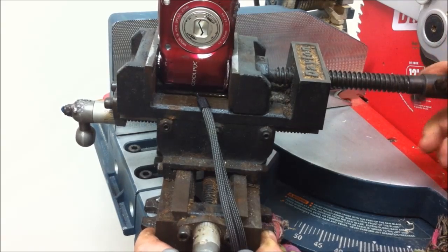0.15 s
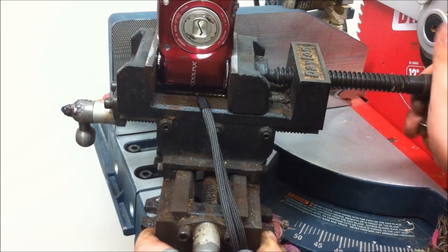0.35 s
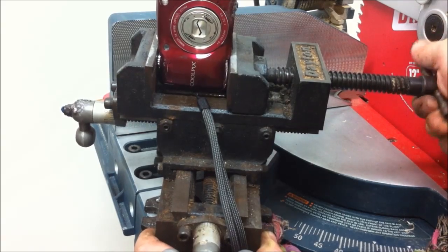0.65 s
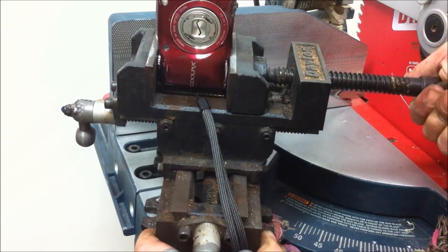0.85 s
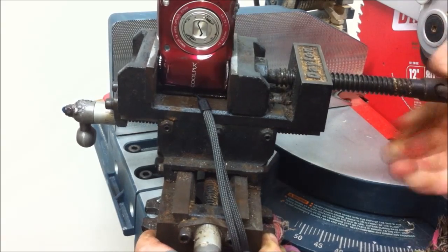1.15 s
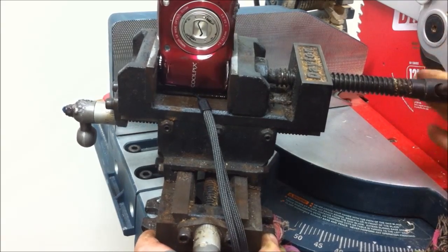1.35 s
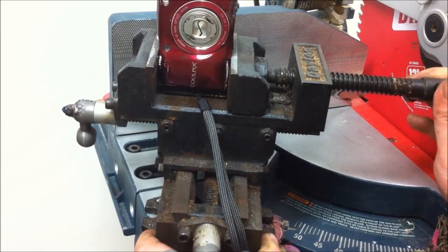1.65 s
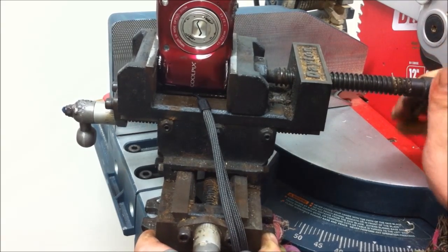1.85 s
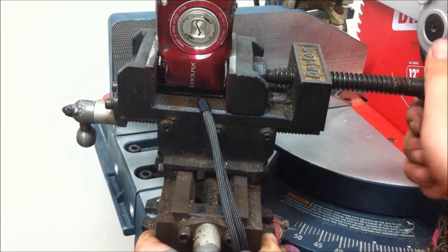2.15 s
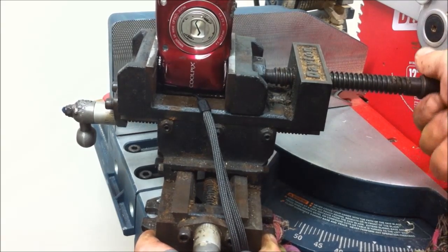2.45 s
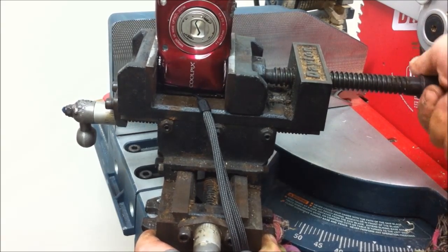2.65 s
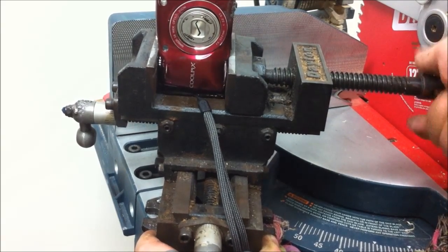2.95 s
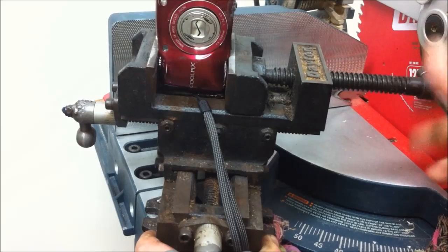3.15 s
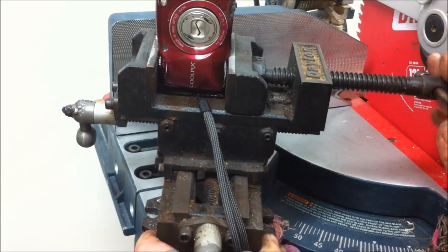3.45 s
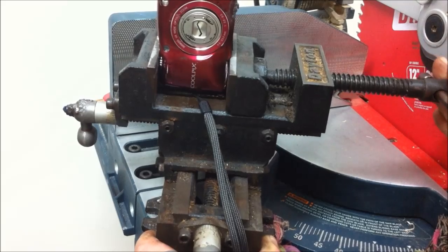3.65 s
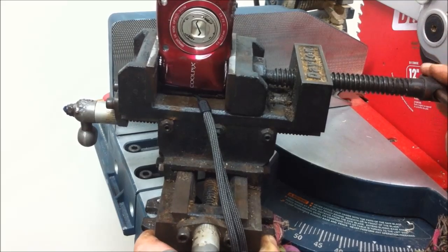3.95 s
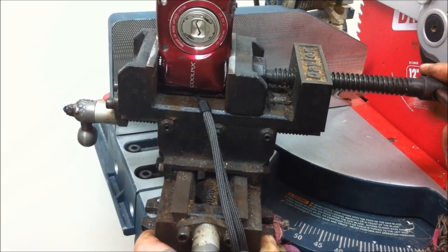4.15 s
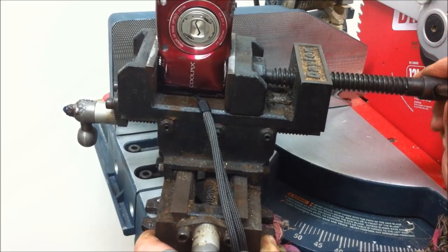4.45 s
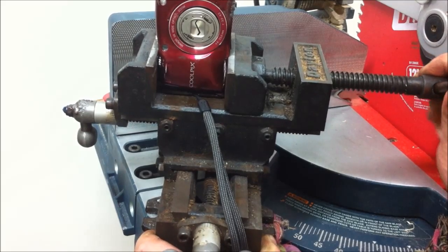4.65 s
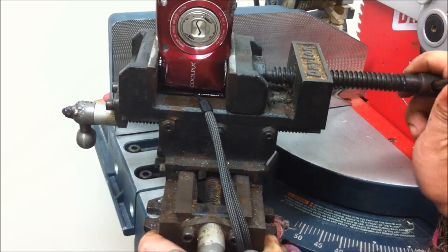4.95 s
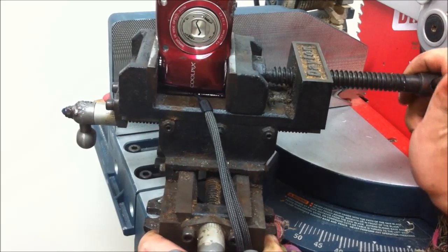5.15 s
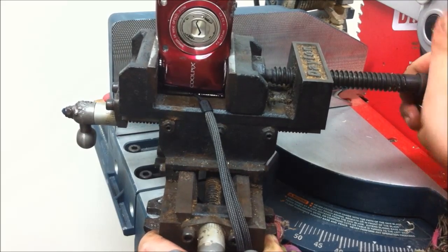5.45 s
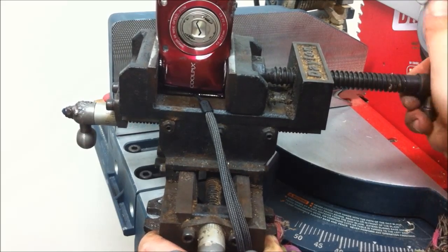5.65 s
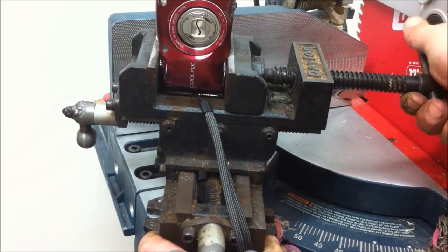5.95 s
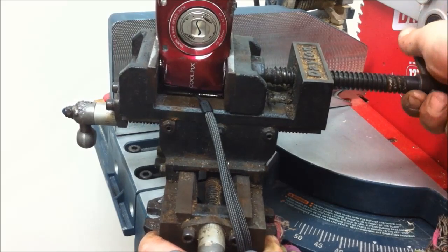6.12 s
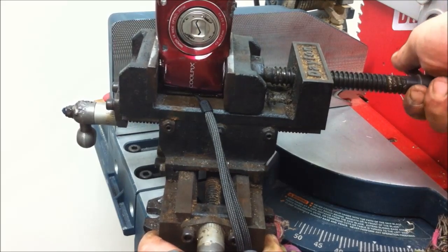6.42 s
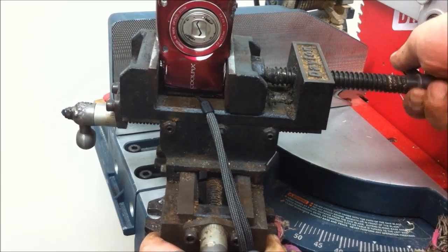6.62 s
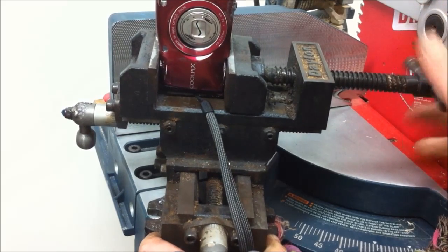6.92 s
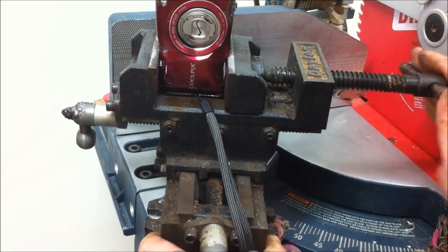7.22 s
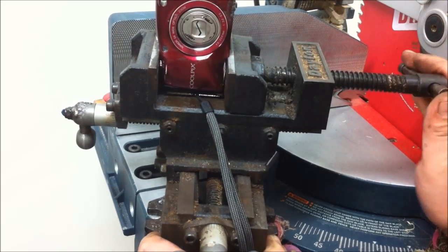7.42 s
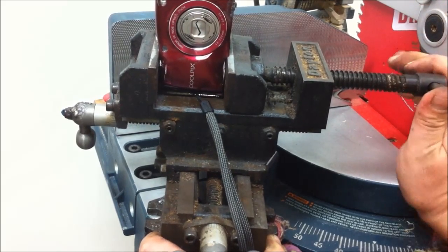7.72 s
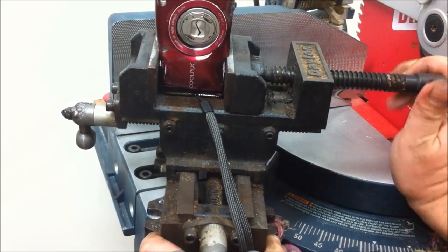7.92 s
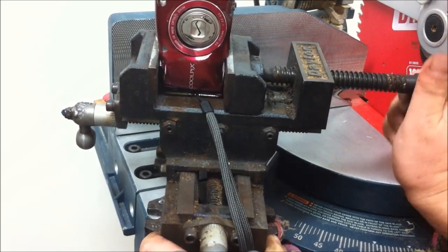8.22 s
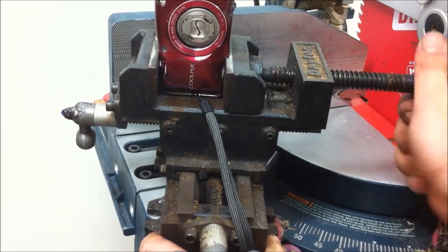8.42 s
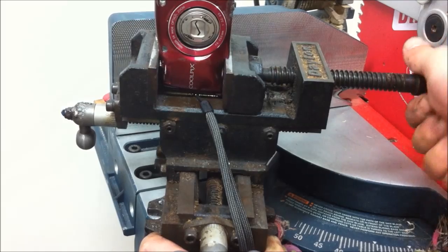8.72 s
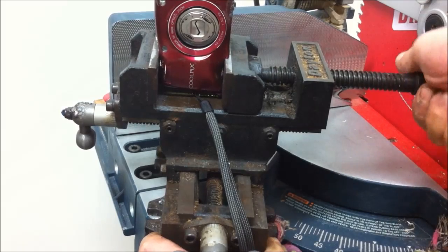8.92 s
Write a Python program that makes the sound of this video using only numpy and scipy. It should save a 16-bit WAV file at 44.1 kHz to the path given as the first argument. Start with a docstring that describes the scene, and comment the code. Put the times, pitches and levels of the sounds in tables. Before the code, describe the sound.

Close to the microphone in a reverberant workshop, a bench vise squeezes a plastic camera. Sharp cracks come irregularly, the loudest a hard snap just after two seconds, each answered by a room tail of about a second. Low bench knocks and short screw grinds lie between them. The middle is sparser; around seven seconds the metal handle clinks and thumps, then cracks crowd together toward the end over steady hiss.

```python
"""Camera crushed in a bench vise

A bench vise is screwed tight on a compact camera in a hard-walled workshop, close to the microphone.
The plastic shell gives way in sharp cracks: short bursts of tearing noise ring through resonances.
The handle clinks and knocks in short decaying rings; random jolts of the screw grind into the booming bench.
The room answers every crack for about a second; a faint whistle comes and goes over a steady hiss."""
import sys
import numpy as np
from scipy import signal
from scipy.fft import rfft, irfft, next_fast_len
from scipy.io import wavfile

SR = 44100
rng = np.random.default_rng(int(sys.argv[2]) if len(sys.argv) > 2 else 0)


def put_to_file(sound):
    """Save the sound as 16-bit audio at rate SR, in the file named by the first command-line argument."""
    columns = np.atleast_2d(sound).T  # one column per channel
    safe = np.clip(columns, -1, 1)
    whole_steps = np.round(safe * 32767)
    wavfile.write(sys.argv[1], SR, whole_steps.astype(np.int16))


def how_loud(loudness_db):
    """Turn decibels into a plain amplitude multiplier (0 dB gives 1, 20 dB gives 10)."""
    steps = np.asarray(loudness_db, float) / 20
    return 10 ** steps


N = 400428  # samples
LEAD = SR // 4  # samples of lead-in, for sounds already under way at the start

# bench, low resonances: (frequency [Hz], width [Hz], gain [dB])
BENCH_BOOM = [(130, 6.5, -16), (156, 32.3, -4.5), (202.3, 12, -3), (247.8, 86, -0.5), (303.6, 70, 0)]
# bench and vise, higher resonances: (frequency [Hz], width [Hz], gain [dB])
BENCH_BODY = [(371.5, 39, 0.5), (484.4, 36, 0.5), (530, 50, -1.5), (600.6, 74, -3.5), (695, 48, -3),
              (939, 200, -9.5)]


def cracks():
    """Each break rings the freed piece of shell at a pitch and an overtone, crunches and spits splinters."""
    # the shell tears in broad cracks: (time [s], peak level [dB], pitch [Hz],
    # overtone and crunch level before trims [dB], splinter level [dB])
    broad_rows = [(-0.053, -20, 2020, -39, -54), (0.6613, -41.5, 1500, -48, -63),
                  (0.8135, -58, 2000, -47, -50), (0.861, -60, 2000, -50.5, -48),
                  (0.9069, -31, 1250, -22, -31.5), (1.2717, -41.5, 1170, -47, -57),
                  (1.382, -38, 2200, -57, -61), (1.4272, -34, 1150, -32, -48),
                  (1.4343, -37, 2570, -42, -46), (1.5048, -18.5, 1920, -12, -18.5),
                  (1.8175, -36, 1390, -25, -31), (1.9747, -40.5, 1330, -37.5, -59),
                  (2.0386, -36.5, 1640, -39, -56), (2.066, -41.5, 1900, -42.5, -43),
                  (2.084, -42, 1590, -43, -55), (2.1554, -21.5, 1590, -28, -47),
                  (2.36, -43, 2000, -35, -40), (2.4833, -54, 2080, -26, -28.5),
                  (2.6879, -46, 1900, -41.5, -70.5), (3.5094, -43, 1150, -35, -49),
                  (3.66, -53.5, 3010, -55.5, -61), (3.7, -44, 1900, -59, -70.5),
                  (3.725, -46, 2400, -65, -72), (4.515, -55.5, 3210, -52, -66),
                  (4.552, -55, 3300, -59, -64), (4.607, -54, 1500, -57, -63), (4.649, -56, 1370, -46, -48),
                  (5.2802, -47, 1380, -96, -66), (5.4323, -48, 1460, -39.5, -47.5),
                  (5.4545, -23.5, 1250, -27, -34.5), (5.7, -73, 1400, -41, -49),
                  (6.0041, -42, 1190, -17.5, -47), (6.018, -50, 2200, -31, -33),
                  (6.2608, -53, 1260, -35.5, -35), (6.668, -46.5, 3210, -66.5, -56.5),
                  (6.79, -51, 2300, -70, -67), (7.1953, -28.5, 1270, -20.5, -27.5),
                  (7.5797, -30.5, 1230, -22, -30.5), (7.9047, -21.5, 1150, -14, -22.5),
                  (8.0152, -35, 1900, -36, -47), (8.0405, -36, 1430, -23.5, -39),
                  (8.103, -37, 1680, -34, -65), (8.309, -40, 1900, -37.5, -50),
                  (8.3425, -41.5, 1430, -36, -37), (8.437, -58, 1900, -42, -48),
                  (8.5545, -66, 1275, -41.5, -41), (8.602, -51, 1480, -41, -60),
                  (8.6198, -31, 2200, -36.5, -33.5), (8.697, -26, 2100, -35, -31),
                  (8.8163, -56, 1410, -24, -82), (8.843, -24.5, 2050, -26.5, -34),
                  (8.9745, -44, 1720, -30, -50), (8.9835, -26, 1500, -38, -42),
                  (8.9893, -21.5, 1510, -22.5, -23.5), (9.0377, -33, 1890, -30, -34.5)]
    # stiff parts snap clean: (time [s], peak level [dB], pitch [Hz], width [Hz], overtone level [dB],
    # overtone [Hz], overtone width [Hz], crunch level [dB], splinter level [dB], room level [dB])
    clean_rows = [(0.357, -33.5, 1240, 600, -31, 2220, 356, -40.5, -61, -13),
                  (0.8943, -30.5, 1360, 500, -28.5, 3170, 1900, -26.5, -41, -11.5),
                  (2.1671, 2, 1780, 860, -16, 4150, 796, -19.5, -21, -12),
                  (3.1566, -18.5, 1200, 616, -17.5, 2910, 502, -12, -48.5, -10),
                  (4.6835, -38.5, 2250, 700, -28, 4800, 331, -22.5, -38, -11.5),
                  (5.5282, -38, 1410, 596, -25, 2900, 590, -27, -40, -14),
                  (5.8627, -12.5, 1620, 710, -13, 3580, 1330, -27, -56.5, -10.5),
                  (6.212, -33, 1190, 300, -24.5, 2780, 200, -15.5, -28, -11.5),
                  (6.4098, -27.5, 3230, 2200, -27, 5820, 500, -20, -41.5, -10.5),
                  (8.668, -15, 2050, 1520, -19.5, 4180, 825, -9, -21, -12.5)]
    breaks = []
    for s, db, hz, over_db, splinter_db in broad_rows:
        panel_part = (s, db, hz, 0.54 * hz + 100)
        over_part = (over_db - 3.5, 1.6 * hz, 3500)  # level [dB], frequency and width [Hz]
        breaks.append((*panel_part, *over_part, over_db - 4.5, splinter_db, 0.027, -11.5))
    for *row, wet_db in clean_rows:
        breaks.append((*row, 0.018, wet_db))  # the tearing dies sooner than in a broad crack

    out = np.zeros(N + LEAD)
    for s, db, hz, width_hz, over_db, over_hz, over_width_hz, crunch_db, splinter_db, t60, wet_db in breaks:
        panel = snap(band(hz, width_hz), db, t60)
        overtone = snap(band(over_hz, over_width_hz), over_db, t60)
        crunch = snap(twice([(3100, 4200, 0)]), crunch_db, t60)
        splinters = snap(twice([(11000, 13000, 0)]), splinter_db, t60=0.0063)
        near, spread = panel + overtone + crunch + splinters
        add(out, s, room(near, wet_db, spread))
    return out[LEAD:]


def snap(response, peak_db, t60):
    """A few milliseconds of tearing through a resonance: (toward the microphone, averaged over directions)."""
    t = np.arange(1024) / SR
    onset = 1 - np.exp(-t / 0.00089)
    tear = rng.standard_normal(len(t)) * onset * how_loud(-60 * t / t60)
    near = filtered(tear, response)
    near *= how_loud(peak_db) / np.abs(signal.hilbert(near)).max()
    # over all directions: the same energy with a smooth spectrum
    click = np.eye(1, len(t), len(t) // 4)[0]
    even = filtered(click, lambda f: np.abs(response(f)))
    even *= np.linalg.norm(near) / np.linalg.norm(even)
    return np.array([near, .98 * even + .15 * near])  # some of this break's own colour reaches the walls


def band(hz, width_hz):
    """A cluster of close modes, flat on top: two resonances in series, to either side of the centre."""
    lower = modes([(hz - .35 * width_hz, .7 * width_hz, 0)])
    upper = modes([(hz + .35 * width_hz, .7 * width_hz, 0)])
    return lambda f: lower(f) * upper(f)


def handle():
    """The loose steel bar clinks in the screw's eye; the hand's grip shifts its main mode a little."""
    # clinks: (time [s], peak level [dB], low mode level [dB], main mode [Hz])
    clink_rows = [(1.26, -60, -45, 3550), (1.4343, -58, -29.5, 3570), (6.8967, -40.5, -51, 3600),
                  (7.0213, -32.5, -32, 3540), (7.0893, -40, -43, 3400), (7.0987, -40, -39, 3540),
                  (7.3962, -34, -35.5, 3480)]
    # the bar's other upper modes: (frequency [Hz], width [Hz], gain [dB])
    bar_modes = [(2200, 1100, -5), (4130, 56, 2), (5750, 350, -8.5)]
    # the bar's low mode, passed twice: (frequency [Hz], width per pass [Hz], gain per pass [dB])
    bar_low_mode = [(1190, 200, 0)]
    out = np.zeros(N + LEAD)
    for s, db, low_db, hz in clink_rows:
        main_mode = (hz, 140, 10)  # frequency and width [Hz], gain [dB]
        upper = snap(modes([bar_modes[0], main_mode, *bar_modes[1:]]), db, t60=0.031)
        low = snap(twice(bar_low_mode), low_db, t60=0.035)
        near, spread = upper + low
        add(out, s, room(near, wet_db=-3.5, spread=spread))
    return out[LEAD:]


def knocks():
    """A soft blow: a short low ring, carried on by the bench's resonances."""
    # dull blows through vise and bench: (time [s], level before the soft onset [dB], pitch [Hz])
    blow_rows = [(-0.004, -20, 303), (0.183, -37.5, 299), (0.366, -32.5, 530), (0.606, -44, 293.4),
                 (0.905, -35, 278), (1.321, -25.5, 416), (1.443, -24.5, 474), (1.507, -6, 560),
                 (1.512, -5, 560), (1.617, -57, 444), (1.818, -21.5, 563), (2.169, -28, 750),
                 (2.885, -53, 834), (3.037, -43, 286), (3.163, -27, 260), (3.357, -33, 250),
                 (3.513, -30.5, 549), (3.666, -35.5, 648), (3.717, -31, 356), (3.834, -44.5, 270),
                 (3.951, -43.5, 285), (3.979, -36, 286), (4.217, -39.5, 560), (4.517, -39, 613),
                 (4.55, -45.5, 627), (4.62, -50, 622), (4.694, -40.5, 317), (4.943, -42, 376),
                 (4.967, -38.5, 279), (5.462, -29.5, 299), (5.873, -32, 344), (6.906, -38.5, 422),
                 (6.94, -30, 396), (7.03, -21, 530), (7.041, -12.5, 523), (7.05, -22, 397),
                 (7.077, -24, 520), (7.108, -17, 534), (7.197, -17, 530), (7.408, -18, 530),
                 (7.581, -19, 587), (7.906, -6.5, 560), (8.678, -32.5, 553), (8.853, -35, 324),
                 (9.054, -35, 363)]
    out = np.zeros(N + LEAD)
    t = np.arange(SR // 5) / SR
    for s, db, hz in blow_rows:
        cycles = 7 - 0.56 * db  # to -60 dB: hard blows are short, softer ones ring longer
        t60 = max(cycles / hz, .01)
        onset = 1 - np.exp(-t / 0.0012)
        ring = how_loud(db - 60 * t / t60) * onset * np.sin(2 * np.pi * hz * t)
        bench = how_loud(-10.5) * filtered(ring, modes(BENCH_BOOM + BENCH_BODY))
        add(out, s, room(ring + bench, wet_db=-0.5))
    return out[LEAD:]


def grind():
    """The thread slips in jolts that shake the bench's low modes and rasp the steel."""
    # pushes on the handle that make the screw grind:
    # (time [s], held [s], boom level [dB], body level [dB], scrape level [dB])
    push_rows = [(-0.01, 0.0073, -34.5, -39.5, -50), (0.3, 0.22, -55, -79, -65),
                 (0.93, 0.0094, -47, -47, -80), (1.33, 0.082, -37.5, -43.5, -59),
                 (1.522, 0.087, -36, -30, -51), (2.188, 0.0043, -38, -44.5, -50),
                 (2.34, 0.017, -74.5, -69, -49.5), (2.79, 0.03, -59.5, -88.5, -84),
                 (3.2, 0.0092, -40.5, -45.5, -79), (3.55, 0.012, -44.5, -54.5, -63),
                 (3.71, 0.041, -46, -54.5, -66), (3.97, 0.062, -55.5, -58.5, -66),
                 (4.15, 0.16, -57, -60, -69.5), (4.5, 0.048, -66.5, -52, -60.5),
                 (4.93, 0.05, -49.5, -49.5, -58.5), (5.49, 0.014, -48, -47.5, -79),
                 (6.03, 0.0095, -48.5, -52, -60), (6.24, 0.019, -56.5, -67, -58),
                 (6.5, 0.022, -50.5, -67, -73.5), (6.78, 0.029, -53.5, -62, -79.5),
                 (7.001, 0.14, -35.5, -40.5, -51.5), (7.23, 0.067, -78, -43.5, -55.5),
                 (7.41, 0.011, -38.5, -38.5, -63), (7.72, 0.015, -53, -49.5, -55),
                 (8.08, 0.03, -53, -45, -63), (8.22, 0.024, -49, -109, -92), (8.43, 0.027, -50, -60, -77.5),
                 (8.8, 0.07, -68, -52, -59), (9.06, 0.073, -45, -69, -51)]
    # rasping steel: (frequency [Hz], width [Hz], gain [dB])
    steel_modes = [(1150, 290, 6.5), (1900, 840, 1), (2665, 1470, -4)]
    boom = filtered(slips(rate=180, spread_db=3.5), twice(BENCH_BOOM))
    body = filtered(slips(rate=500, spread_db=5.0), twice(BENCH_BODY))
    scrape = filtered(slips(rate=960, spread_db=3.5), modes(steel_modes))
    boom = unit(room(boom, wet_db=-2.0)[:N])
    body = unit(room(body, wet_db=-10.5)[:N])
    scrape = unit(room(scrape, wet_db=-4.0)[:N])
    return np.sum(swells(push_rows) * [boom, body, scrape], axis=0)


def slips(rate, spread_db):
    """Stick-slip jolts at random moments, rate per second on average, a few stronger than the rest."""
    jolts = (rng.random(N) < rate / SR) * rng.standard_normal(N)
    return jolts * how_loud(spread_db * np.minimum(rng.exponential(size=N), 3))


def swells(rows):
    """One gain per level column: every row swells, holds and eases off at the same pace."""
    rise, fall = 179.5, 68  # dB per second
    hop = 64  # samples per envelope point
    t = np.arange(0, N + hop, hop) / SR
    s, held, *dbs = np.transpose(rows)[:, :, None]
    shape_db = -rise * np.maximum(s - t, 0) - fall * np.maximum(t - s - abs(held), 0)
    gains = [np.linalg.norm(how_loud(db + shape_db), axis=0) for db in dbs]  # rows add in power
    return np.array([np.interp(np.arange(N) / SR, t, gain) for gain in gains])


def whistle():
    """A narrow breathy tone, noise through a sharp resonance, faintly comes and goes."""
    # swells of the whistle: (time [s], held [s], level [dB])
    swell_rows = [(0.45, 0.2, -76), (2.9, 0.17, -72), (4.12, 0.24, -74.5), (4.93, 0.09, -68.5)]
    # its resonance, passed twice: (frequency [Hz], width per pass [Hz], gain per pass [dB])
    whistle_mode = [(1936, 79, 0)]
    tone = unit(filtered(rng.standard_normal(N), twice(whistle_mode)))
    return swells(swell_rows)[0] * tone


def room(x, wet_db, spread=None):
    """The sound, its near reflections and a fresh diffuse tail that dies by frequency.
    The tail is fed by spread, the sound averaged over all directions, where that differs from x."""
    # decay of the workshop: (frequency [Hz], time to -60 dB [s])
    decay_times = [(300, 0.21), (1000, 0.92), (1900, 1.15), (3500, 0.95), (7000, 1.02), (14000, 0.31)]
    # near reflections, typical values: (delay [s], level before treble loss [dB])
    wall_echoes = [(.0065, -12), (.009, -13), (.014, -20.5), (0.022, -32.5)]
    hz, t, z = signal.stft(rng.standard_normal(SR), SR, nperseg=256)
    decay = how_loud(-60 * t / along(decay_times, hz)[:, None])
    tail = signal.istft(z * decay, SR, nperseg=256)[1][:SR]
    tail *= 1 - np.exp(-np.arange(SR) / SR / 0.0017)  # the diffuse field builds up
    near = np.zeros(SR)
    for s, db in wall_echoes:
        near[round(s * SR * rng.uniform(.93, 1.07))] = how_loud(db + rng.normal(0, 1.0))
    near = filtered(near, lambda hz: 1 / (1 + 1j * hz / 5000))  # cluttered surfaces return little treble
    near[0] += 1  # the direct sound
    far = how_loud(wet_db) * tail / np.linalg.norm(tail)
    if spread is None:
        spread = x
    return signal.fftconvolve(x, near) + signal.fftconvolve(spread, far)


def hiss():
    """The steady room tone and microphone noise: shaped random noise at a fixed level."""
    # spectrum: (frequency [Hz], relative density [dB])
    hiss_spectrum = [(24, -33.5), (40, -6), (75, -16), (152, 5), (366, 7.5), (670, -0.5), (799, -8),
                     (1740, -8.5), (10400, -19), (15650, -17.5), (15900, -37.5)]
    noise = filtered(rng.standard_normal(N), lambda hz: how_loud(along(hiss_spectrum, hz)))
    return how_loud(-60) * unit(noise)


def unit(x):
    """Scaled to rms 1."""
    return x / np.sqrt(np.mean(x ** 2) + 1e-20)


def along(points, hz):
    """Interpolates (frequency [Hz], value) points on a log frequency axis."""
    f, v = np.transpose(points)
    return np.interp(np.log(hz + 1), np.log(f + 1), v)


def filtered(x, response):
    """x times a complex response of frequency."""
    m = next_fast_len(len(x) + SR // 4)
    return irfft(rfft(x, m) * response(np.fft.rfftfreq(m, 1 / SR)), m)[:len(x)]


def modes(table):
    """Causal response of a set of resonances, summed with alternating sign."""
    def response(f):
        total = 0
        for k, (centre, width, db) in enumerate(table):
            damping = 1j * f * width
            total = total + (-1) ** k * how_loud(db) * damping / (centre * centre - f * f + damping)
        return total
    return response


def twice(table):
    """The response of the resonances passed two times in series."""
    return lambda f: modes(table)(f) ** 2


def add(track, s, x):
    """Mixes x into the track at time s."""
    part = track[round(s * SR) + LEAD:][:len(x)]
    part += x[:len(part)]


def scene():
    """All sources at one microphone, which cuts the deep bass and adds its own hiss."""
    sources = cracks() + handle() + knocks() + grind() + whistle()
    low_cut_hz = 92
    heard = filtered(sources, lambda hz: (1j * hz / (low_cut_hz + 1j * hz)) ** 2)
    return (heard + hiss())[None]


def band_limit(x):
    """A steep low-pass at the top of the band."""
    return signal.sosfilt(signal.butter(12, 16510, fs=SR, output="sos"), x)


def record(dry):
    """The finished mix of the microphone, as it is stored."""
    return band_limit(dry)


dry = scene()
out = record(dry)
put_to_file(out)
```